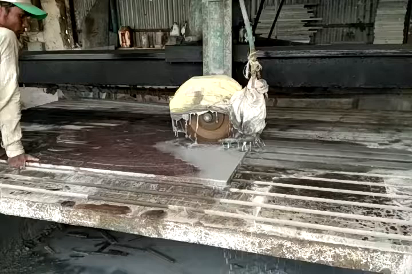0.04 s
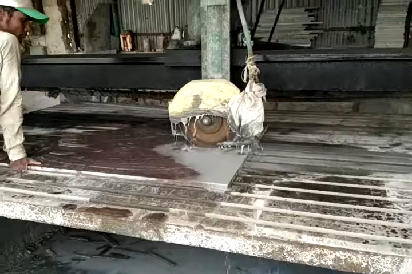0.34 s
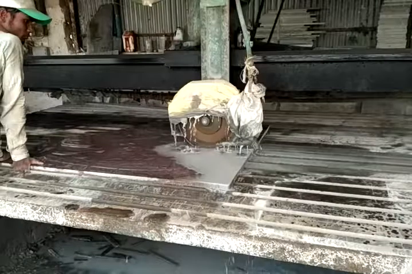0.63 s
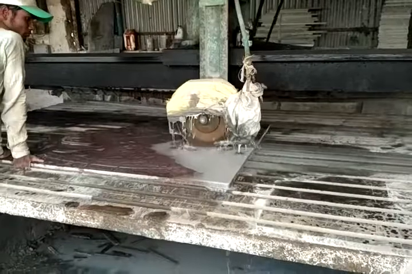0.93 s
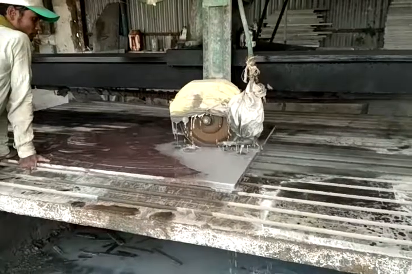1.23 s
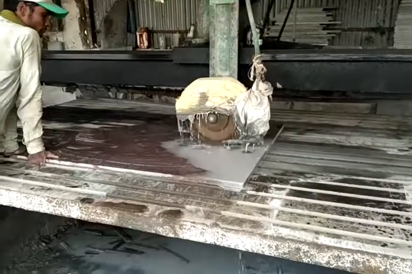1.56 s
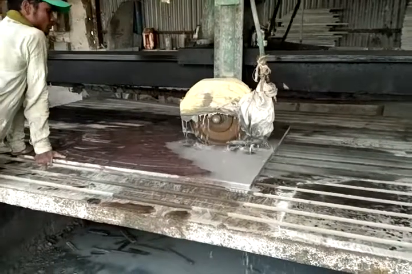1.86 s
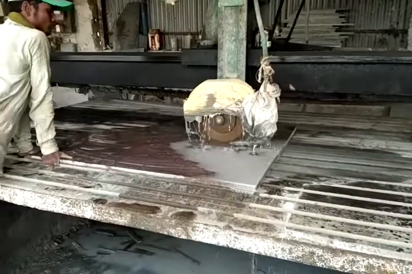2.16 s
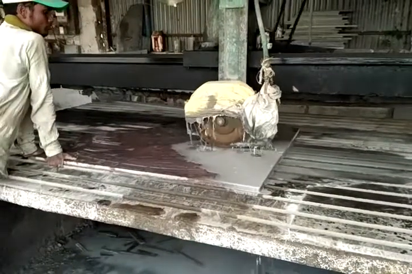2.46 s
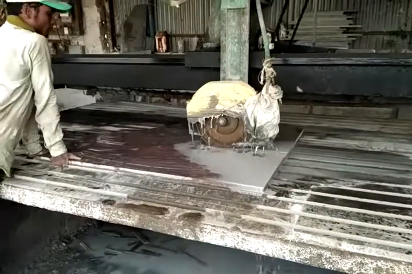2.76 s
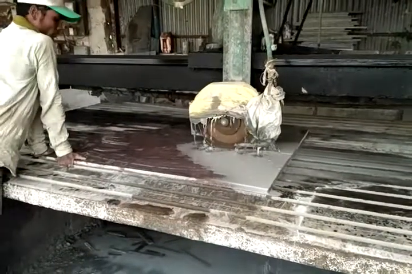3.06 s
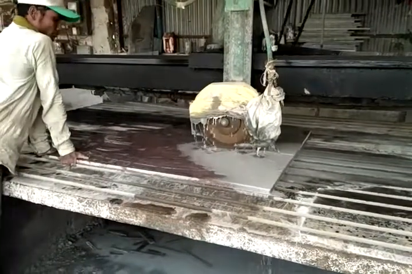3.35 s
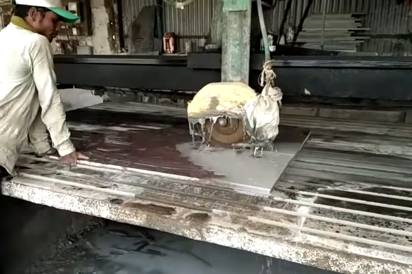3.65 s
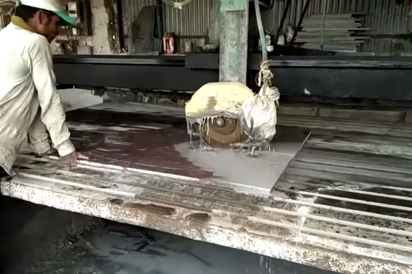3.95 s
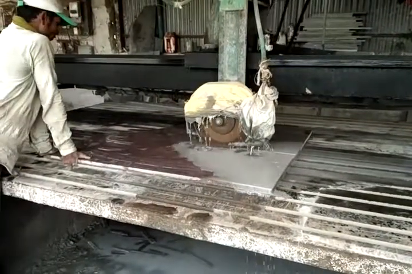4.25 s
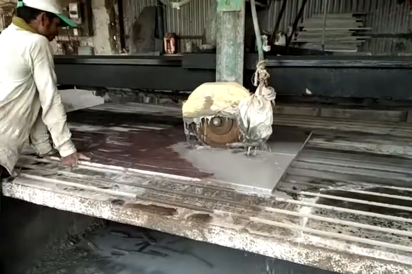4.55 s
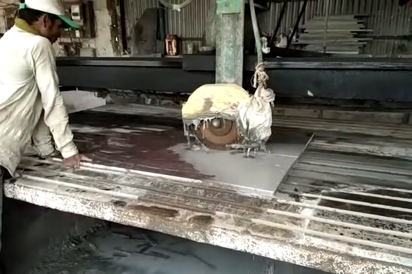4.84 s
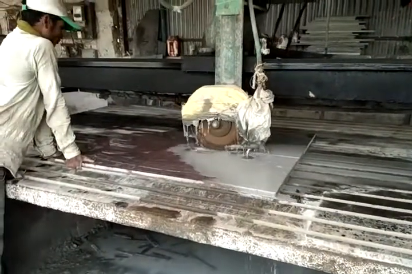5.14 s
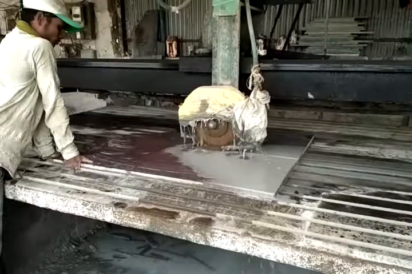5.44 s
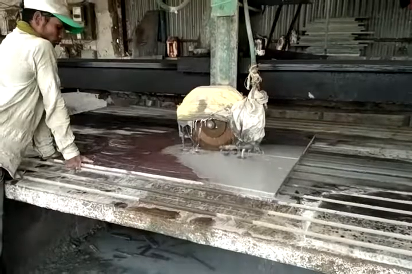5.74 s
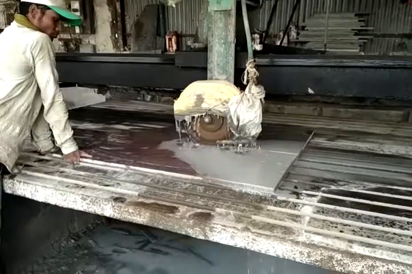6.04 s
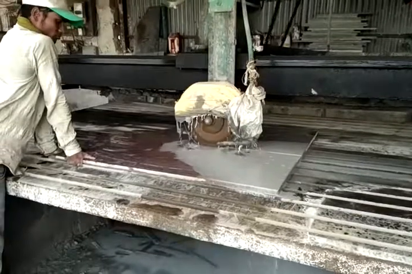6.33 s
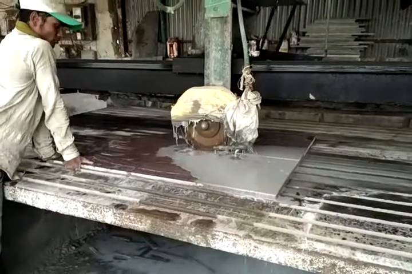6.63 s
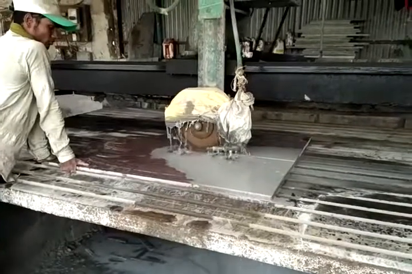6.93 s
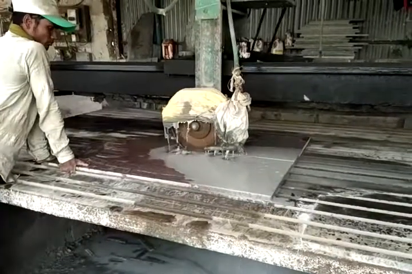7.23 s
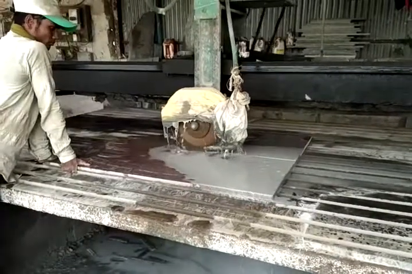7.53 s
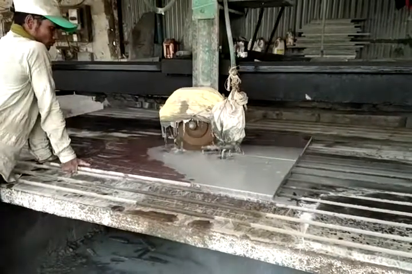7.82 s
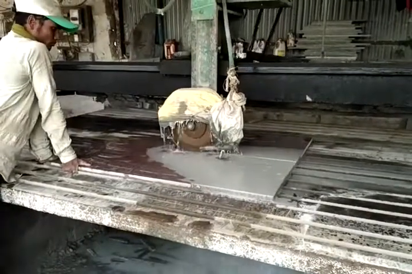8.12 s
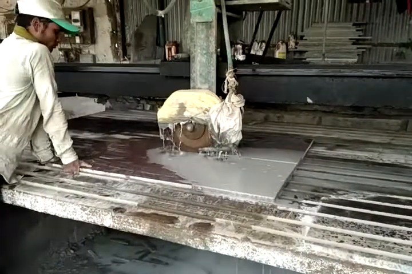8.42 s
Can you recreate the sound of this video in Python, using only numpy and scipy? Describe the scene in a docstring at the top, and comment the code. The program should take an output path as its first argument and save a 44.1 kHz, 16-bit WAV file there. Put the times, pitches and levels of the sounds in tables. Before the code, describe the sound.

A water-cooled circular saw cuts a stone slab in a workshop, heard from close by. After a brief silence, a bright hiss of grinding and spray swells in and holds, with a thin metallic ring from the blade. Beneath it, air and water flutter, puff and splash irregularly. One dull thump comes early as the level eases, and about halfway through the sound steps down and carries on more quietly.

```python
"""A water-cooled diamond saw cuts a granite slab in a workshop, heard from close by.
Grit tearing at the stone and water spray make a broadband hiss, which drives the resonances of the
steel blade. Beneath it, flung air and spray flutter and puff, drops slap the slab, and one dull
thump sounds. The sound swells in, settles, and steps down in level at five seconds."""
import sys
import numpy as np
from scipy import signal
from scipy.fft import rfft, irfft
from scipy.io import wavfile
from scipy.ndimage import uniform_filter1d

SR = 44100
rng = np.random.default_rng(int(sys.argv[2]) if len(sys.argv) > 2 else 0)


def digitize_waveform(pressure):
    """Quantize a signal to 16-bit integers and store it at the path in sys.argv[1].

    Rows of a 2-D input are taken as channels; values are limited to [-1, 1].
    """
    field = np.atleast_2d(pressure).T
    bounded = np.clip(field, -1, 1)
    quanta = np.round(bounded * 32767).astype(np.int16)
    wavfile.write(sys.argv[1], SR, quanta)


N = 373968
TIME, FREQ = np.arange(N) / SR, np.arange(N // 2 + 1) * SR / N + 1e-3
START_S, SWELL_S = .612, .265  # onset of the sound, length of its opening swell

# Resonances of blade and guard, lowest first.
# Each row: frequency in Hz, bandwidth in Hz, early and late level in dB relative to the hiss.
BLADE_MODES = [(880, 60, 8.5, 7.5), (2550, 110, 0, 1), (2820, 140, -2, -1), (3000, 60, 0, -2),
               (3300, 40, -5, 0), (3570, 200, -3, -4), (3880, 200, -1, -4), (4310, 50, -2, 2),
               (4535, 100, 5, 1.5), (4750, 190, 1, 1.5), (5270, 50, -2, -12), (5590, 80, 0, -6),
               (6010, 200, -4, -12), (6530, 120, -4, -3), (10400, 300, -1, -8), (11620, 260, 1, -8),
               (11930, 140, 0.5, 3.5), (12800, 280, 6, 3), (13810, 190, 5, 7), (14900, 350, 1.5, 4.5)]
# Moments when the lowest resonance sings out. Each row: middle and half length in seconds, boost in dB.
LOW_MODE_SWELLS = [(2.17, 0.08, 8), (6.702, 0.06, 7), (7.119, 0.018, 13), (7.96, .04, 12)]
# Spectrum of grinding and spray. Each row: frequency in Hz, relative spectral density in dB.
HISS_SPECTRUM = [(30, -17), (50, -4.5), (70, -1), (160, -1.5), (250, -10.5), (700, -9), (1200, -10),
                 (2200, -8.5), (2800, -7.5), (4100, -7), (5200, -6), (7000, -6), (9700, -6.5),
                 (11500, 1.23), (14400, -2), (15700, -7.5)]
# The loudest puffs, gurgles and splashes. Each row: middle and length in seconds,
# centre frequency and bandwidth in Hz, level in dB relative to the saw.
LOUD_PUFFS = [(.988, .042, 170, 240, -11.5), (1.434, 0.015, 200, 150, -7.5), (1.512, 0.045, 467, 120, -9.5),
              (1.66, 0.14, 292, 223, -14.5), (1.934, 0.017, 676, 340, -5.5),
              (1.942, 0.019, 1480, 400, -7.5), (2.285, 0.017, 306, 500, -6), (2.39, .017, 179, 170, -3.5),
              (2.408, 0.056, 514, 250, -15), (2.687, 0.015, 300, 200, -9.5),
              (2.611, 0.054, 110, 150, -10.5), (2.896, 0.022, 364, 160, -10), (3.089, 0.059, 355, 160, -13),
              (3.145, 0.09, 60, 50, -18), (3.257, 0.0066, 250, 400, -6.5), (3.486, 0.031, 845, 1600, -10.5),
              (3.634, 0.026, 427, 250, -9.5), (4.37, 0.012, 338, 200, -3), (4.963, 0.022, 280, 150, -7),
              (4.997, 0.011, 380, 180, -3.5), (5.414, 0.083, 385, 180, -12.5),
              (5.618, 0.026, 1110, 1100, -9), (5.777, .06, 5600, 700, -11), (7.28, 0.081, 290, 120, -15),
              (7.93, 0.052, 483, 200, -12), (8.353, .057, 393, 250, -13)]
# Quick changes of the overall level. Each row: middle and length in seconds, change in dB.
LEVEL_STEPS = [(.632, .008, 9), (1.25, .05, -4.5), (5.024, 0.019, -6.5)]


def saw(wander_db=1.5, wander_hz=10, wander_falloff=0.56):
    """Forced vibration: grinding noise drives blade modes that swell and fade as the contact shifts."""
    hiss = colour(HISS_SPECTRUM)
    # the spray and three points of the rim, each with its own path through the room
    spray, *contacts = [rfft(grinding()) * hiss * workshop() for _ in range(4)]
    sound = irfft(spray, N)
    travel = ramp(start_s=2.9, length_s=4)  # moving along the cut takes the modes from early to late levels
    contact_db = [wander_db * walk(wander_hz) for _ in contacts]
    lowest_hz = BLADE_MODES[0][0]
    for mode, (hz, width_hz, early_db, late_db) in enumerate(BLADE_MODES):
        point = mode % len(contacts)
        ring = irfft(contacts[point] * resonance(hz, width_hz), N)
        strength = (1 - travel) * undb(early_db) + travel * undb(late_db)
        swell_db = contact_db[point] * (lowest_hz / hz) ** wander_falloff
        if mode == 0:
            swell_db += sum(db * bump(middle_s, half_s) for middle_s, half_s, db in LOW_MODE_SWELLS)
        sound += ring * strength * undb(swell_db)
    return unit(sound * runout())


def grinding(grit_db=-4):
    """Impact noise: dense clicks of grit on stone add to the white noise of the spray."""
    grit = unit(impacts(per_s=5000, spread_db=5.5) * rng.choice([-1, 1], N))
    return unit(rng.standard_normal(N) + undb(grit_db) * grit)


def runout(turn_hz=38.1, once=.028, twice=.03, waver_db=0.56):
    """Amplitude modulation: a blade slightly out of true bites harder once and twice a turn."""
    speed_hz = turn_hz * (1 + 0.0026 * walk(2.7))
    angle = 2 * np.pi * np.cumsum(speed_hz) / SR
    bite = 1 + once * np.sin(angle) + twice * np.sin(2 * angle)
    return bite * undb(waver_db * walk(25))


def flutter(soft_hz=490, low_hz=82, gust_db=1.0, steady_db=-15.5, rise_db=7.5, rise_s=1.7):
    """Turbulence: air and spray flung off the blade arrive as soft pressure dips in uneven bunches."""
    eddies = -impacts(per_s=340, spread_db=4.5) * undb(-gust_db * walk(22))
    low_pass = 1 / (1 + 1j * FREQ / soft_hz) ** 2
    high_pass = 1 / np.sqrt(1 + (low_hz / FREQ) ** 4)
    level_db = steady_db - rise_db * (1 - ramp(START_S, rise_s))
    return unit(irfft(rfft(eddies) * low_pass * high_pass, N)) * undb(level_db)


def puffs(size=16384, pops_per_s=900, churn_db=-5):
    """Band-limited noise: bursts of pops and churning take a rough pitch from the centre of their band."""
    sound = np.zeros(N + size)
    from_middle_s = (np.arange(size) - size // 2) / SR
    freq = np.arange(size // 2 + 1) * SR / size
    for middle_s, length_s, hz, width_hz, db in LOUD_PUFFS + small_puffs():
        band = 1 / np.sqrt(1 + (2 * (freq - hz) / width_hz) ** 4)
        band *= np.minimum(2 * freq / hz, 1)  # thins the bass
        pops = -unit((rng.random(size) < pops_per_s / SR) * rng.exponential(size=size))
        churn = undb(churn_db) * rng.standard_normal(size)
        envelope = np.exp(-2 * (from_middle_s / length_s) ** 2)
        burst = irfft(rfft(pops + churn) * band) * envelope
        rms = np.sqrt(np.sum(burst ** 2) / (length_s * SR))
        start = int(middle_s * SR) - size // 2
        sound[start:start + size] += undb(db) * burst / rms
    return sound[:N]


def small_puffs(count=24, centre_hz=430, width_share=0.59, length_s=0.02, level_db=-16, spread_db=0.5):
    """Constant relative bandwidth: rows of weaker puffs at random times, the higher the broader."""
    middles_s = rng.uniform(START_S + SWELL_S, N / SR, count)
    longer, octaves, louder = rng.standard_normal((count, 3)).T
    lengths_s = length_s * 2 ** (longer / 2)
    hz = centre_hz * 2 ** octaves
    return list(zip(middles_s, lengths_s, hz, width_share * hz, level_db + spread_db * louder))


def thump(start_s=1.279, hz=85, decay_s=0.0072, level_db=8.5):
    """Damped oscillation: one low swing dies within about a cycle and is heard as a dull thump."""
    age = np.maximum(TIME - start_s, 0)
    return undb(level_db) * np.sin(2 * np.pi * hz * age) * np.exp(-age / decay_s)


def spatter(hz=900, width_hz=1400, level_db=-24):
    """Heavily damped impacts: single drops slap the wet slab and tick without ringing."""
    drops = -impacts(per_s=60, spread_db=1.5)
    ticks = irfft(rfft(drops) * resonance(hz, width_hz) ** 2, N)
    return undb(level_db) * unit(ticks)


def workshop(t60_s=0.053, wet_db=-15, gap_s=.004, size=16384):
    """Reverberation: frequency response of the direct path plus reflections from table and walls."""
    age = TIME[:size]
    tail = rng.standard_normal(size) * np.exp(-np.log(1000) * age / t60_s) * (age > gap_s)
    return 1 + undb(wet_db) * rfft(tail, N) / np.sqrt(np.sum(tail ** 2))


def dip(sound, middle_s=1.202, half_s=0.039, depth_db=-11, edge_hz=4900):
    """Shelving attenuation: the bass and mids dip briefly while the hiss above the edge holds."""
    lows = irfft(rfft(sound) / (1 + (FREQ / edge_hz) ** 20), N)
    gain = undb(depth_db * bump(middle_s, half_s))
    return sound + lows * (gain - 1)


def loudness(start_db=-42, swell_db=12):
    """Amplitude envelope: silence, then a swell and quick steps that add in decibels."""
    db = start_db + swell_db * ramp(START_S, SWELL_S)
    for middle_s, length_s, change_db in LEVEL_STEPS:
        db += change_db * ramp(middle_s - length_s / 2, length_s)
    return undb(db) * (TIME > START_S)


def resonance(hz, width_hz):
    """Frequency response of a damped resonator, with gain 1 at its centre."""
    return 1 / (1 + 1j * (FREQ ** 2 - hz ** 2) / (FREQ * width_hz))


def impacts(per_s, spread_db):
    """Poisson process: one-sided impulses, mostly small and a few large."""
    hits = rng.random(N) < per_s / SR
    return hits * undb(spread_db * np.minimum(rng.exponential(size=N), 3))


def colour(points):
    """Spectral envelope: gain interpolated over log frequency from (Hz, dB) points."""
    hz, db = np.transpose(points)
    return undb(np.interp(np.log(FREQ), np.log(hz), db))


def walk(rate_hz):
    """Smoothed noise: a random wander with standard deviation 1."""
    hold = int(SR / rate_hz)
    steps = np.repeat(rng.standard_normal(N // hold + 1), hold)
    return unit(uniform_filter1d(steps, hold)[:N])


def ramp(start_s, length_s):
    """Linear rise from 0 to 1, which then holds."""
    return np.clip((TIME - start_s) / length_s, 0, 1)


def bump(middle_s, half_s):
    """Gaussian pulse of height 1."""
    return np.exp(-((TIME - middle_s) / half_s) ** 2)


def undb(db):
    """Amplitude ratio from decibels."""
    return np.exp(np.asarray(db) * (np.log(10) / 20))


def unit(x):
    """Normalisation to standard deviation 1."""
    return x / np.std(x)


def scene(headroom_db=5.5):
    """Superposition and saturation: the sources add, and their peaks round off in one microphone."""
    sound = saw() + flutter() + spatter() + puffs()
    sound = unit(np.tanh(sound / undb(headroom_db)))
    sound = (dip(sound) + thump()) * loudness()
    return np.array([sound, sound])


def record(dry, top_hz=15790):
    """Band limiting: an elliptic low-pass filter cuts the highest treble steeply."""
    return signal.sosfilt(signal.ellip(12, .1, 80, top_hz, fs=SR, output="sos"), dry)


dry = scene()
out = record(dry)
digitize_waveform(out)
```